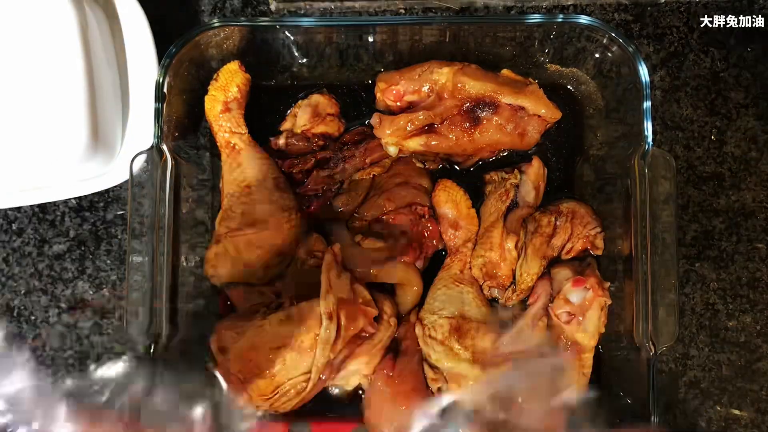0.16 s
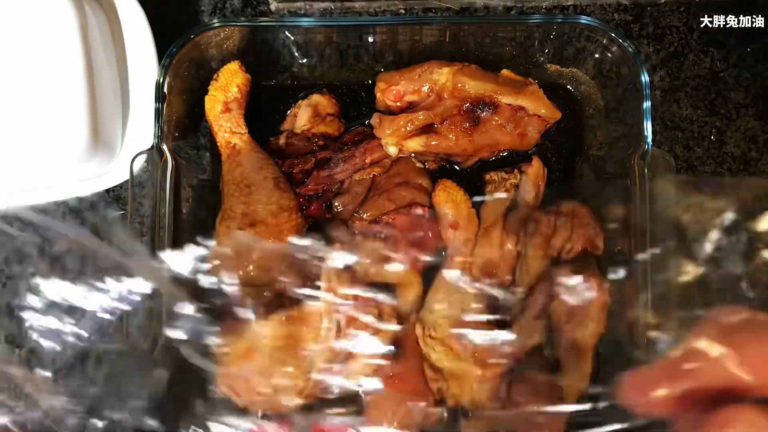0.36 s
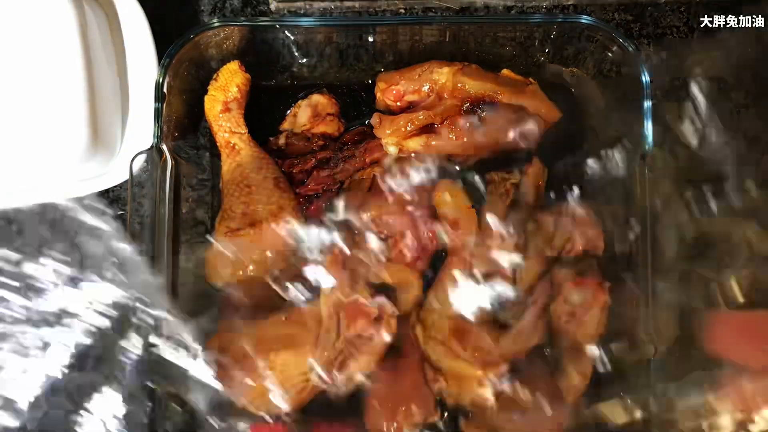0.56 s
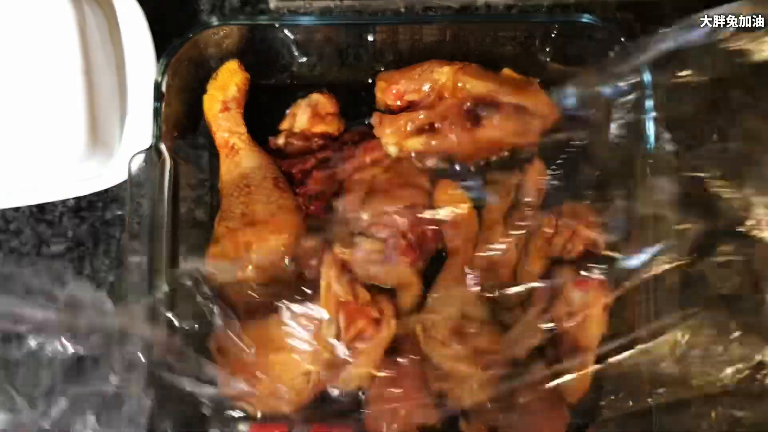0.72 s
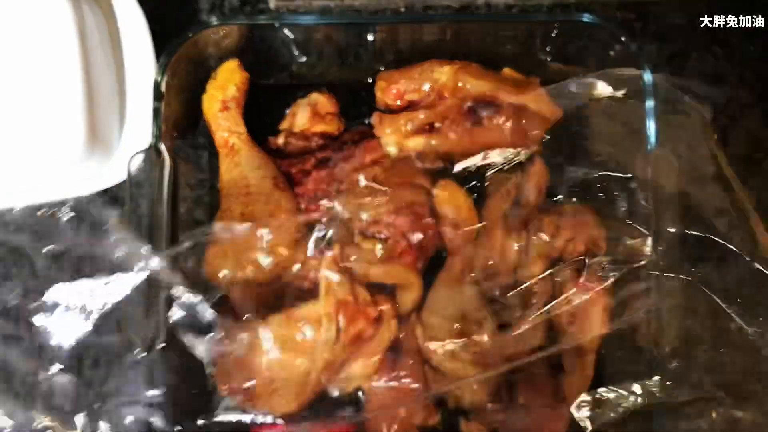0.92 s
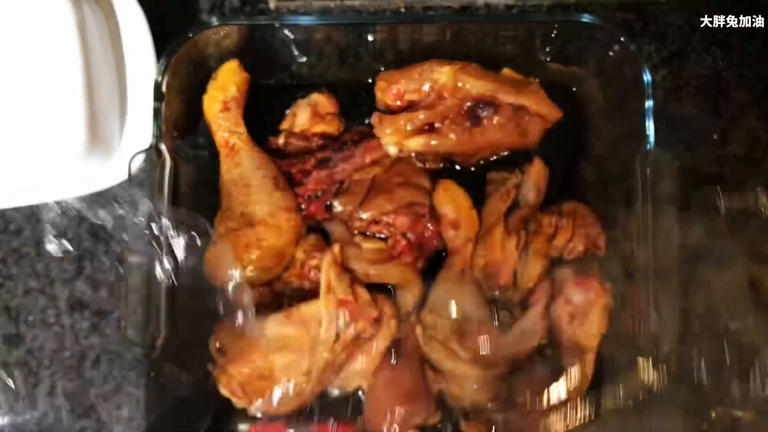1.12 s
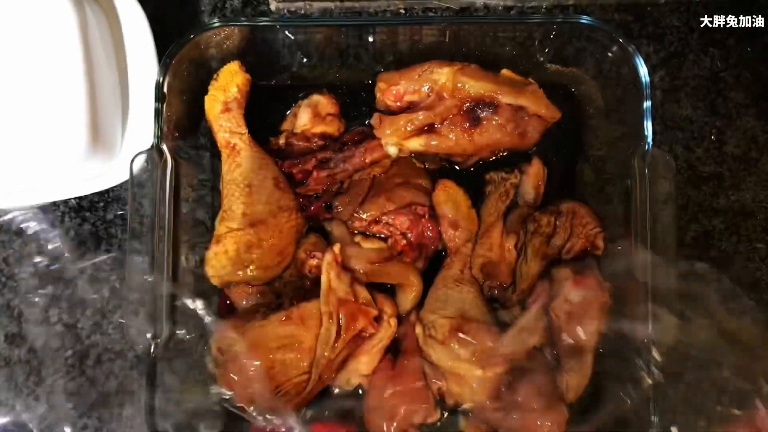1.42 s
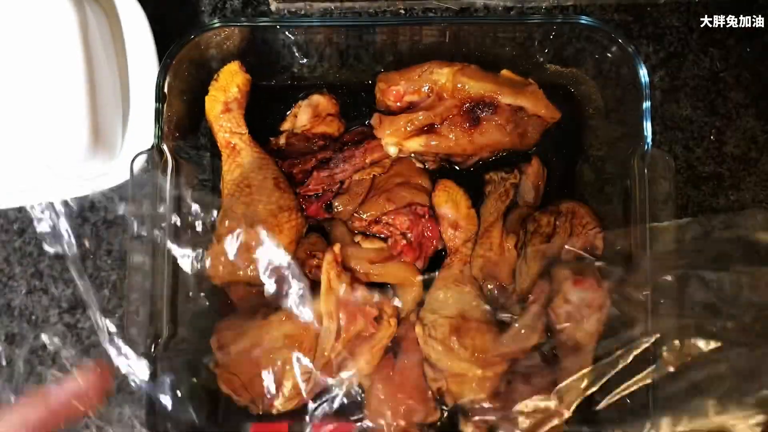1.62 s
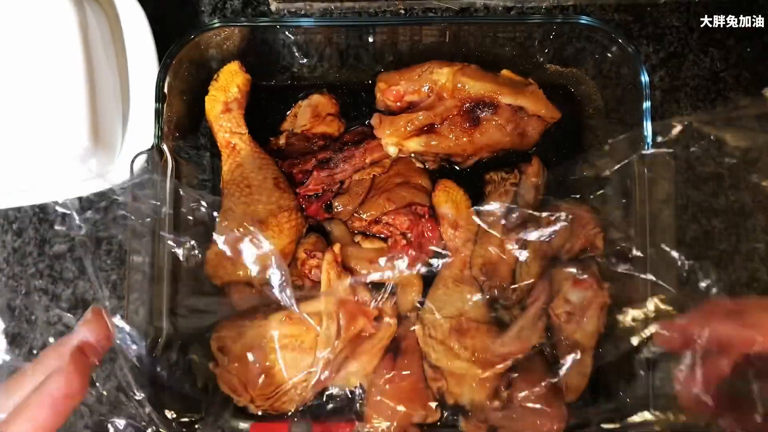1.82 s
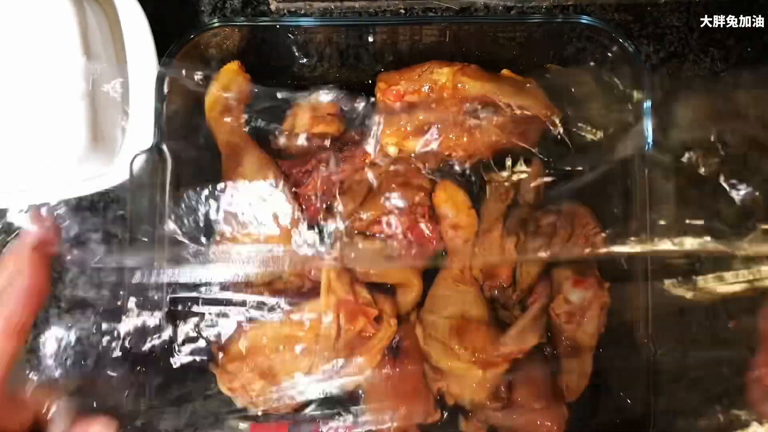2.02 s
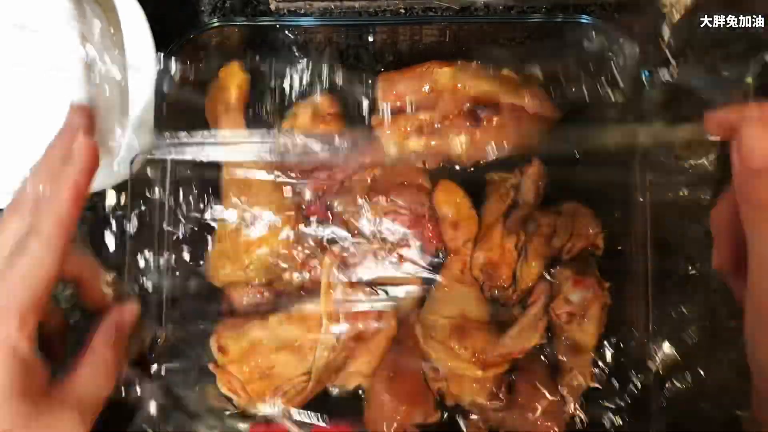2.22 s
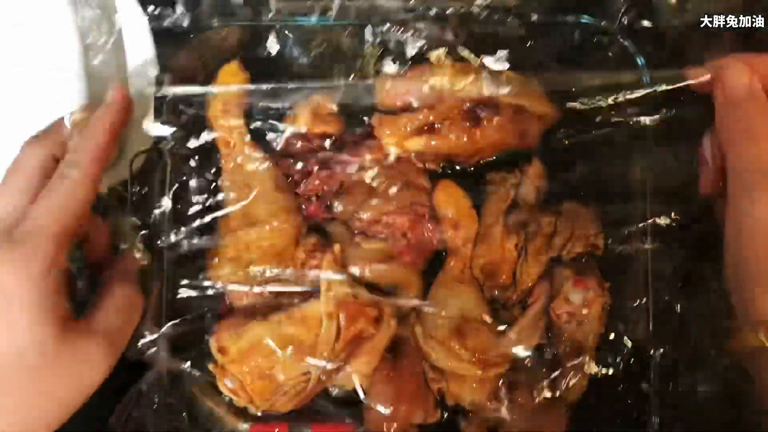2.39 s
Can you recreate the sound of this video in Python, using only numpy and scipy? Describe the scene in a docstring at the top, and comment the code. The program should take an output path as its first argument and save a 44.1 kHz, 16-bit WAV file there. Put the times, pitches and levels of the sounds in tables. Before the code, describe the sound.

Crinkly cling film stretched across a glass dish in a kitchen, sharp crackles over faint hum

```python
"""Cling film stretched over a dish

Cling film is pulled and stretched over a glass dish in a kitchen, close to the microphone.
Thousands of creases snap as filtered clicks with noisy rattles; louder single snaps stand out.
Dying sines make the pitched ticks, a dull knock on the dish and low puffs of air at each tug.
An appliance hums over room noise; early on, everything fades out and in again."""
import sys
import numpy as np
from scipy import signal
from scipy.fft import rfft, irfft, next_fast_len
from scipy.io import wavfile

SR = 44100
rng = np.random.default_rng(int(sys.argv[2]) if len(sys.argv) > 2 else 0)


def to_wav(s):
    """Save 16-bit WAV."""
    ch = np.atleast_2d(s).T  # columns
    pcm = np.round(np.clip(ch, -1, 1) * 32767)  # PCM
    wavfile.write(sys.argv[1], SR, pcm.astype(np.int16))


N = 112454
TIME_S = np.arange(N) / SR


def from_db(db):
    """Level to amplitude: 20 dB is a factor of ten."""
    return 10 ** (np.asarray(db) / 20)


def rms_one(x):
    """Normalisation of power: scale to rms 1."""
    return x / np.sqrt(np.mean(x ** 2) + 1e-20)


def coloured(x, spectrum):
    """Linear filtering: weight each frequency by a curve that drops below its first point; rms is left free."""
    lower_edge = (spectrum[0][0] / 2, spectrum[0][1] - 30)
    hz, db = np.transpose([lower_edge] + list(spectrum))
    size = next_fast_len(len(x))
    f = np.arange(size // 2 + 1) * SR / size + 1   # the 1 Hz offset avoids log(0)
    gain = from_db(np.interp(np.log(f), np.log(hz), db))
    return irfft(rfft(x, size) * gain, size)[:len(x)]


def drift(rate_hz):
    """Low-pass noise: two equal real poles leave a slow random course of rms 1."""
    r = np.exp(-2 * np.pi * rate_hz / SR)
    noise = rng.standard_normal(N + SR)
    settled = signal.lfilter([1], [1, -2 * r, r * r], noise)[SR:]
    return rms_one(settled)


def dying_tone(start_s, db, hz, t60_s):
    """Damped resonance: a sine from its start on, losing 60 dB in t60; also returns the time since the start."""
    t = np.maximum(TIME_S - start_s, 0)
    return from_db(db - 60 * t / t60_s) * np.sin(2 * np.pi * hz * t), t


def snap(hz, octaves, rattle_db, t60_s):
    """Impulse response: click, echo and dying noise in a band reaching some octaves each side of its centre."""
    click = (1.7, -0.85)   # push and rebound of a crease letting go
    echo_s, echo_gain = 0.0002, 0.62   # the click comes back off the counter
    x = from_db(rattle_db - 60 * np.arange(2048) / SR / t60_s) * rng.standard_normal(2048)
    x[:2] = click
    x[int(echo_s * SR)] += echo_gain
    band_hz = [hz / 2 ** octaves, min(hz * 2 ** octaves, 0.45 * SR)]
    b, a = signal.butter(1, band_hz, "band", fs=SR)
    return signal.lfilter(b, a, x) / b[0]   # the filter passes the first sample at full size


def kitchen():
    """Stationary background: the mains hum of an appliance, a wavering sine, over dull filtered room noise."""
    # Room noise spectrum. Each row: frequency in Hz, relative level in dB per Hz.
    room_spectrum = [(25, -26), (50, 0), (75, -1.5), (130, -10), (300, -10), (600, -11.5), (1200, -17),
                     (3000, -22), (15000, -53)]
    hum_hz, hum_db, hum_waver_db = 99.96, -52, 2
    room_db, room_patchy_db = -59.5, 0.7
    hum_level = from_db(hum_db + hum_waver_db * drift(3.4))
    hum = np.sqrt(2) * hum_level * np.sin(2 * np.pi * hum_hz * TIME_S)
    noise = rms_one(coloured(rng.standard_normal(N), room_spectrum))
    return hum + from_db(room_db + room_patchy_db * drift(4.2)) * noise


def puffs():
    """Damped membrane: the sheet flaps as a tug tightens it, a low dying sine with a soft onset."""
    # Tugs. Each row: start in seconds, nominal level in dB, pitch in Hz, t60 in seconds.
    tugs = [(0.179, -44, 118, 0.059), (0.241, -44, 50, 0.072), (.29, -47, 67.6, 0.22), (.41, -49, 50, .12),
            (0.472, -38, 70.6, 0.086), (0.79, -34.5, 73, 0.088), (0.793, -46, 128, 0.1),
            (0.862, -42.5, 65.5, 0.092), (1.06, -54, 50, 0.13), (1.16, -50, 50, 0.12),
            (1.256, -53, 55, .12), (1.39, -59, 50, 0.11), (1.581, -53, 60, .1), (1.635, -52, 70, 0.063),
            (1.78, -52, 64.6, 0.12), (2.044, -36.5, 69, 0.09), (2.39, -57, 55, 0.1)]
    rise_s = 0.0065
    out = np.zeros(N)
    for start_s, db, hz, t60_s in tugs:
        tone, t = dying_tone(start_s, db, hz, t60_s)
        out += 2 * (1 - np.exp(-t / rise_s)) * tone   # 2 offsets loss during the rise
    return out


def knock():
    """Modal vibration: the taut sheet slaps the dish, whose modes die away together."""
    # What the dish rings with: mode frequencies in Hz.
    dish_hz = (680, 1020, 1647, 2250)
    start_s, mode_db, t60_s = 2.04, -37, 0.09
    return sum(dying_tone(start_s, mode_db, hz, t60_s)[0] for hz in dish_hz)


def ticks():
    """Damped resonance: small taut patches of film tick at a pitch."""
    # Taut patches. Each row: start in seconds, initial amplitude in dB, pitch in Hz, t60 in seconds.
    patches = [(.1659, -36, 8600, .005), (.2843, -19, 3800, .005), (.3156, -18, 8800, .007),
               (1.0445, -36, 8500, .006), (2.3417, -40, 3600, .006), (2.3905, -46, 4900, .007),
               (2.397, -47, 4400, .006), (2.4405, -41, 8200, .004)]
    return sum(dying_tone(*patch)[0] for patch in patches)


def snaps():
    """Impulsive release: loud creases let go one by one, each a click with a broad rattle."""
    # Loud creases. Each row: start in seconds, nominal peak in dB, centre in Hz, initial rattle level in dB.
    loud_creases = [(0.0183, -35, 6300, -12), (0.0445, -33, 8200, -22), (0.0731, -36, 8900, -25),
                    (0.1397, -35, 4500, -11), (0.1758, -30, 7300, -16), (0.2885, -20, 6000, -12),
                    (0.3545, -23, 4500, -11), (0.3745, -19, 9000, -14), (0.4172, -24, 7200, -21),
                    (0.4255, -21, 5000, -29), (0.4385, -24, 7200, -21), (0.5022, -28, 8700, -15),
                    (0.5196, -24, 5000, -21), (0.6374, -35, 8600, -16), (0.7054, -38, 7200, -18),
                    (0.7679, -30, 5300, -24), (0.831, -22, 7100, -17), (0.8383, -8, 4800, -19),
                    (0.9677, -31, 6100, -17), (0.9816, -30, 8600, -17), (0.9961, -32, 6200, -14),
                    (1.0273, -30, 3200, -8), (1.0889, -33, 10000, -22), (1.1176, -30, 7600, -30),
                    (1.1327, -30, 7600, -30), (1.2123, -35, 6400, -15), (1.2947, -34, 5500, -21),
                    (1.3079, -36, 5900, -24), (1.4072, -34, 6800, -19), (1.4383, -36, 8400, -13),
                    (1.4506, -34, 11000, -12), (1.4893, -32, 8100, -16), (1.5, -34, 6800, -18),
                    (1.58, -25, 5000, -9), (1.7294, -29, 6900, -23), (1.7561, -31, 9900, -30),
                    (1.7777, -34, 6100, -21), (1.835, -29, 9300, -15), (1.8878, -36, 4600, -16),
                    (1.8985, -34, 4600, -17), (1.9182, -33, 5600, -20), (1.9585, -29, 8800, -15),
                    (2.0421, -18, 5000, -14), (2.1328, -31, 7300, -30), (2.1492, -31, 7900, -30),
                    (2.2305, -36, 7700, -20), (2.2504, -28, 4300, -16), (2.3125, -34, 8800, -18)]
    reach_octaves, rattle_t60_s = 1.85, 0.025
    out = np.zeros(N + 2048)
    for start_s, db, hz, rattle_db in loud_creases:
        i = int(start_s * SR)
        out[i:i + 2048] += from_db(db) * snap(hz, reach_octaves, rattle_db, rattle_t60_s)
    return out[:N]


def crackle():
    """Shot noise: creases let go at random in clumps, each kind with its own band, over hissing rubbing."""
    # How hard the film is worked, one list per stretch.
    # Each row: time in seconds, nominal crackle level in dB, level of its low part in dB relative to that.
    pull = [
        [(0.0, -77, -15), (0.024, -39.5, -20), (0.062, -53.5, -16), (0.074, -44.5, -11), (0.08, -52, -21),
         (0.1385, -54, -10), (0.141, -38.5, -18), (0.152, -58, -17), (0.17, -52, -26), (0.179, -38.5, -17),
         (0.196, -40, -6.5), (0.218, -43.5, -11.5), (0.294, -29, -13), (0.38, -31, -11.5),
         (0.406, -39.5, -11.5), (0.456, -36.5, -18), (0.476, -42.5, -3), (0.5, -44.5, -8.5)],
        [(0.51, -41, -17), (0.58, -45, -14), (0.612, -48, -12), (0.652, -49.5, -19), (0.696, -59, -15),
         (0.704, -50, -26), (0.74, -62.5, -5), (0.78, -36, -12.5), (0.802, -33.5, -3.5), (0.836, -40.5, -15.5),
         (0.84, -28, -28), (0.852, -35.5, -4), (0.93, -46, -17.5), (0.934, -43, -20), (1.0, -47.5, -11)],
        [(1.01, -42.5, -15), (1.025, -47.5, -25), (1.029, -46, 1), (1.052, -51.5, -7), (1.116, -44, -17),
         (1.146, -48, -7), (1.16, -45.5, -13.5), (1.204, -52, -6.5), (1.214, -49, -13), (1.23, -51, -9),
         (1.328, -53, -8.5), (1.338, -45, -10), (1.386, -42.5, -12), (1.43, -56, -1.5), (1.45, -50, -18),
         (1.48, -52.5, -11), (1.5, -50.5, -2.5)],
        [(1.51, -55.5, -3), (1.542, -51.5, -4), (1.582, -32, -11), (1.6, -40, -7), (1.76, -48, -12),
         (1.812, -47, -4.5), (1.82, -52.5, -2.5), (1.838, -47, -11), (1.86, -57.5, -2.5), (1.902, -49.5, -22),
         (1.91, -63, 5), (1.918, -47, -24), (1.926, -55, -17), (1.946, -48, -1), (1.978, -41.5, -11),
         (2.0, -34, -12)],
        [(2.01, -34, -4), (2.028, -34, -18.5), (2.042, -29, -7.5), (2.076, -45.5, -12.5), (2.108, -47.5, -11),
         (2.148, -47, -14), (2.21, -55, -7), (2.254, -42.5, -9), (2.332, -53.5, -10.5), (2.344, -52, -18),
         (2.372, -64.5, -1), (2.402, -47, -13), (2.424, -62, 4), (2.442, -55, -6), (2.448, -55.5, 3.5),
         (2.484, -55.5, -17), (2.55, -53, -5.5)],
    ]
    # Colour of the crackle. Each row: frequency in Hz, relative level in dB per Hz.
    film_spectrum = [(530, -73), (900, -6), (1680, 3), (2050, 0), (2640, 4.5), (3120, 2), (3600, 0),
                     (6100, -3.5), (7570, 0), (9390, 0), (10300, -8), (12700, -0.5), (15700, -4)]
    # Colour of its low part. Each row: frequency in Hz, relative level in dB per Hz.
    low_spectrum = [(120, -0.5), (220, -1.5), (400, 0.5), (700, -5), (1100, -8), (1600, -19)]
    creases_per_s = 3500   # at a pull of -45 dB, before clumping
    size_spread_db, denser_per_db = 3.5, 0.2
    clump_db, clump_rate_hz = 1.25, 55
    kinds, kind_clump_db, kind_clump_rate_hz = 16, 3, 21
    lowest_hz, highest_hz, reach_octaves = 2480, 13800, 0.82
    rattle_db, rattle_t60_s = -23, 0.018
    rubbing_db = -5   # relative to the creases, before colouring

    s, level_points, low_points = np.concatenate(pull).T
    level_db = np.interp(TIME_S, s, level_points)
    low_db = np.interp(TIME_S, s, low_points)
    clumping_db = clump_db * drift(clump_rate_hz)

    # A harder pull frees more creases; making each smaller keeps the mean power steady.
    denser_db = denser_per_db * (np.maximum(level_db, -60) + 45)
    sizes = from_db(size_spread_db * np.minimum(rng.exponential(1, N), 3.2))
    signed_sizes = sizes * rng.choice([-1, 1], N)
    lets_go = rng.random(N) < creases_per_s * from_db(clumping_db + denser_db) / SR
    clicks = signed_sizes * lets_go * from_db(-denser_db / 2)

    # Each kind comes in its own runs.
    kind = rng.integers(0, kinds, N)
    centres_hz = np.sqrt(np.linspace(lowest_hz ** 2, highest_hz ** 2, kinds))
    grains = np.zeros(N)
    for k, hz in enumerate(centres_hz):
        runs = from_db(kind_clump_db * drift(kind_clump_rate_hz))
        grain = rms_one(snap(hz, reach_octaves, rattle_db, rattle_t60_s))
        grains += signal.fftconvolve(clicks * (kind == k) * runs, grain)[:N]

    rubbing = from_db(clumping_db) * rng.standard_normal(N)
    highs = rms_one(coloured(rms_one(grains) + from_db(rubbing_db) * rubbing, film_spectrum))
    lows = rms_one(coloured(rubbing + rms_one(clicks), low_spectrum))
    return from_db(level_db) * (highs + from_db(low_db) * lows)


def scene():
    """Superposition: the pressures of kitchen, dish and film add."""
    return (kitchen() + puffs() + knock() + ticks() + snaps() + crackle())[None]


def record(dry):
    """Band limiting and gain: the microphone drops the deepest bass, the level fades, the top is cut."""
    mic_low_hz, cutoff_hz = 35, 15750
    fade_points_s = [0.07, 0.105, 0.117, 0.16]   # fade begins, silence, silence ends, full again
    before_db = -2.5   # up to the end of the silence all is a little quieter
    fade = np.interp(TIME_S, fade_points_s, [1, 0, 0, 1]) ** 1.6
    fade = fade * np.where(TIME_S < fade_points_s[2], from_db(before_db), 1)
    bass_cut = signal.butter(2, mic_low_hz, "high", fs=SR, output="sos")
    top_cut = signal.ellip(12, 0.5, 75, cutoff_hz, fs=SR, output="sos")
    return signal.sosfilt(top_cut, signal.sosfilt(bass_cut, dry) * fade)


dry = scene()
out = record(dry)
to_wav(out)
```